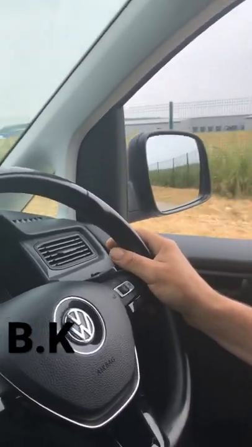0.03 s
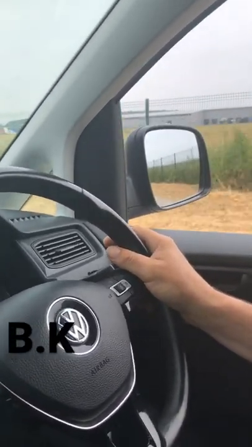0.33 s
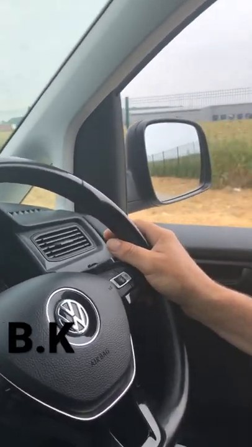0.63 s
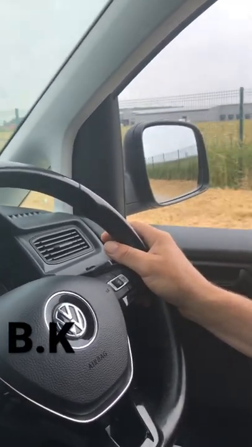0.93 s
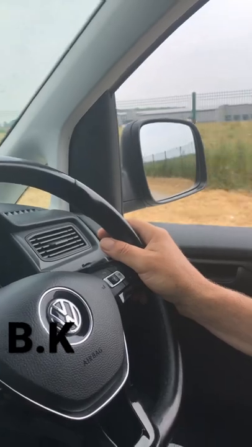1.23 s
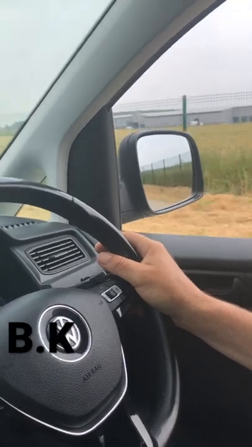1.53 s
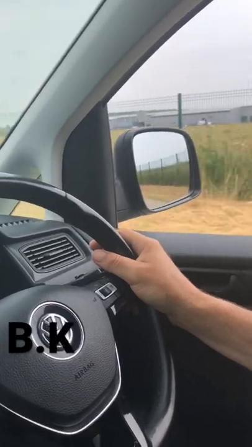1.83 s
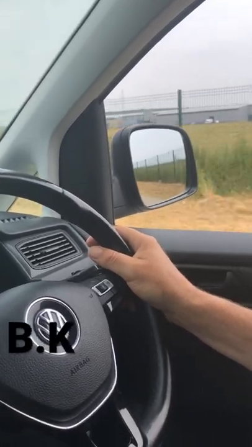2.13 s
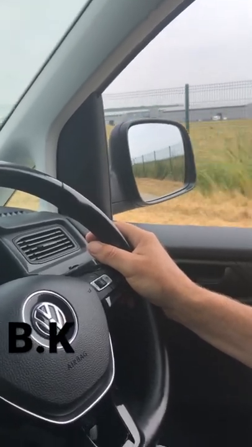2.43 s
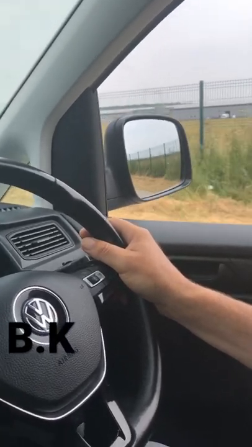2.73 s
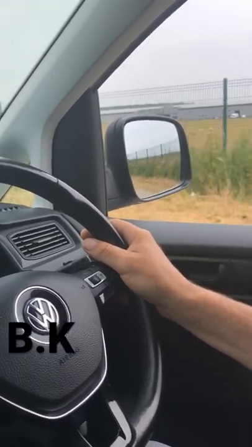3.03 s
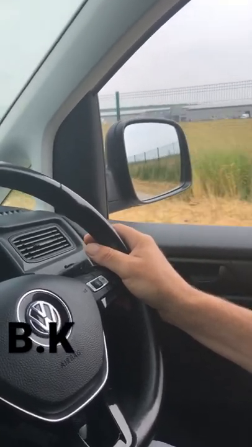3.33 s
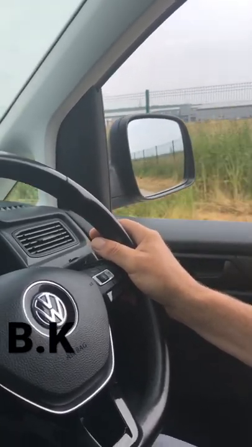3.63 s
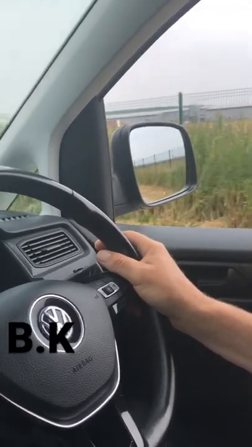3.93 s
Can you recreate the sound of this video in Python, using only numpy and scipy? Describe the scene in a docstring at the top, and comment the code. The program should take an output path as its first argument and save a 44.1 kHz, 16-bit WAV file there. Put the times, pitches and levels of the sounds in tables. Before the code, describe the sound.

A high, wavering wind whistle sings over the side mirror of a moving van, heard from inside. It climbs in pitch and turns breathy at times, over wind hiss, tyre roar, a slowly rising engine and low booms from bumps.

```python
"""A high, wavering whistle: air sings over the side mirror of a van gathering speed on a country road.
Heard from inside, it climbs with each gust and breaks from a clean tone into a rough, breathy one.
Under it, wind hisses along the window, the tyres roar, the engine slowly rises and the cabin booms
over bumps. Near the end the driver eases off and loose trim ticks once, with a small bounce."""
import sys
import numpy as np
from scipy import signal
from scipy.fft import rfft, irfft
from scipy.io import wavfile

SR = 44100
rng = np.random.default_rng(int(sys.argv[2]) if len(sys.argv) > 2 else 0)


def log_audio(samples):
    """Write samples as a 16-bit WAV file to the path given in sys.argv[1]."""
    # one column per channel
    frames = np.atleast_2d(samples).T
    # limit to full scale, then quantise
    limited = np.clip(frames, -1, 1)
    pcm = np.round(limited * 32767).astype(np.int16)
    wavfile.write(sys.argv[1], SR, pcm)


N = 176400  # 4 s


def undb(db):
    """Decibels to gain."""
    return 10 ** (np.asarray(db) / 20)


def unit(x):
    """Scale to an rms of 1."""
    return x / np.sqrt(np.mean(np.abs(x) ** 2))


def clock():
    """Time of every sample in seconds."""
    return np.arange(N) / SR


def curve(table, column=1):
    """An automation lane: one column of a table, joined by straight lines in time."""
    rows = np.array(table)
    return np.interp(clock(), rows[:, 0], rows[:, column])


def swell(at, length):
    """A bell-shaped envelope peaking at `at`, with a standard deviation of `length` seconds."""
    return np.exp(-.5 * ((clock() - at) / length) ** 2)


def coloured(eq):
    """Noise of rms 1 through an EQ curve of (f/Hz, level/dB) points."""
    hz, db = np.array(eq).T
    f = np.maximum(np.fft.rfftfreq(N, 1 / SR), 1)
    gain = undb(np.interp(np.log(f), np.log(hz), db))
    return unit(irfft(rfft(rng.standard_normal(N)) * gain, N))


def wander(rate_hz):
    """A smooth random modulator of rms 1 that moves at up to about this rate."""
    f = np.fft.rfftfreq(N, 1 / SR)
    lowpass = (f > 0) / (1 + (f / rate_hz) ** 2)
    return unit(irfft(rfft(rng.standard_normal(N)) * lowpass, N))


def tone(hz):
    """A sine of rms 1 on a moving pitch."""
    return np.sqrt(2) * np.sin(2 * np.pi * np.cumsum(hz) / SR)


def resonance(hz, width_hz):
    """A randomly driven resonance of rms 1, whose centre may move."""
    phase = 2 * np.pi * np.cumsum(hz * np.ones(N)) / SR
    return wander(width_hz / 2) * np.cos(phase) + wander(width_hz / 2) * np.sin(phase)


def peak(hz, centre_hz, half_width_hz, db):
    """The lift in dB that a stationary resonance gives to a moving tone."""
    return db / (1 + ((hz - centre_hz) / half_width_hz) ** 2)


# EQ of the body rumble: f/Hz, level/dB
RUMBLE_EQ = [(15, -40), (29, -39), (37, -7), (44, 0), (62, -2), (76, -10), (88, -3.5), (99, -2.5),
             (109, -3.5), (121, -2), (136, -11.5), (160, -8.5), (230, -13.5), (320, -16), (385, -19),
             (470, -18), (560, -24), (1200, -62)]
# fader of the body rumble: t/s, level/dB
RUMBLE_FADER = [(0, -25), (1.12, -21), (1.5, -22), (2.3, -23), (3, -20), (4, -22.5)]


def body_rumble():
    """The low bed: the van's body rumbles as it rolls."""
    return coloured(RUMBLE_EQ) * undb(curve(RUMBLE_FADER))


# fader of the cabin's main air mode: t/s, level/dB
DRONE_FADER = [(0, -21), (.25, -32), (.45, -28), (1, -43), (1.8, -36), (2.05, -22), (2.4, -25), (3.2, -40),
               (3.5, -23.5), (4, -26)]


def cabin_drone(pitch_hz=97.35, waver_hz=2.8, flicker_db=1.7):
    """The road keeps the air in the cabin humming near one pitch."""
    hum = tone(pitch_hz + waver_hz * wander(12.4))
    return hum * undb(curve(DRONE_FADER) + flicker_db * wander(33))


# tyres slapping the edge of a bump: t/s, length/s, level/dB
SLAPS = [(1.14, .012, -30)]
# EQ of the slap: f/Hz, level/dB
SLAP_EQ = [(150, -16), (600, 10), (1200, -2), (2700, -8), (8000, -50)]
# booms over bumps in the road: t/s, length/s, level/dB
BUMP_BOOMS = [(.71, .045, -23), (1.074, 0.028, -19), (1.18, 0.031, -13), (1.29, 0.021, -16.5),
              (1.803, 0.049, -20), (2.029, 0.025, -17), (2.211, .03, -19), (2.43, 0.076, -18),
              (2.949, 0.036, -13)]
# cabin modes shaken by a bump: f/Hz, width/Hz, relative level/dB
BOOM_MODES = [(46.9, 7.1, 2), (98.2, 24.4, 0), (256.3, 112, -10.5)]


def road_bumps():
    """Each bump sets the cabin booming; the tyres slap the edge of one."""
    slap = coloured(SLAP_EQ) * sum(undb(db) * swell(at, length) for at, length, db in SLAPS)
    shake = sum(undb(db) * swell(at, length) for at, length, db in BUMP_BOOMS)
    boom = sum(undb(db) * tone(hz + width / 2 * wander(width)) for hz, width, db in BOOM_MODES)
    return slap + shake * unit(boom)


# revs, as the rate of the four-stroke cycle: t/s, f/Hz
ENGINE_REVS = [(0, 20.05), (2, 23.0), (3, 24.85), (3.45, 25.5), (4, 25.4)]
# engine harmonics: multiple of the cycle rate, base level/dB
ENGINE_HARMONICS = [(4, -37.5), (8, -37.5), (9, -38.5), (11, -44), (12, -37), (14, -42.5), (16, -45.5)]
# cabin resonances that the harmonics sweep through: f/Hz, half width/Hz, boost/dB
CABIN_PEAKS = [(95, 3.9, 15.5), (238.6, 13.6, 5.5), (346.6, 18, 6)]


def engine(ease_off_s=3.38, ease_off_db=-4, waver_hz=.5, flicker_db=1.43):
    """Harmonics rise with the revs, boom in the cabin's resonances and soften as the driver eases off."""
    cycle_hz = curve(ENGINE_REVS)
    duck_db = ease_off_db * np.clip((clock() - ease_off_s) * 10, 0, 1)  # 0.1 s fade
    mix = 0
    for order, db in ENGINE_HARMONICS:
        hz = order * cycle_hz
        boom_db = sum(peak(hz, *mode) for mode in CABIN_PEAKS)
        harmonic = tone(hz + waver_hz * wander(5.8))
        mix = mix + harmonic * undb(db + boom_db + duck_db + flicker_db * wander(2.9))
    return mix


# EQ of the tyre roar: f/Hz, level/dB
TYRE_EQ = [(250, -12.5), (480, -4), (640, -0.5), (785, 0), (835, -2.5), (885, 2.5), (935, -5), (985, 5.5),
           (1060, -6.5), (1180, -2), (1270, -4.5), (1340, -5.5), (1410, 1.5), (1460, -3), (1610, -3),
           (1750, -8), (1890, -12), (2400, -14.5), (3000, -23.5), (4500, -34.5), (9000, -42)]
# fader of the tyre roar: t/s, level/dB (before gain_db)
TYRE_FADER = [(0, -33.5), (1.15, -31), (1.6, -31.5), (2.7, -30), (2.9, -28.5), (3.0, -29), (3.35, -26),
              (3.5, -30), (4, -27)]


def tyre_roar(gain_db=-1.78, flicker_db=1.12):
    """The tyres roll out a restless midrange roar that builds with speed."""
    return coloured(TYRE_EQ) * undb(curve(TYRE_FADER) + gain_db + flicker_db * wander(33))


# fader of the tread's song: t/s, level/dB
TREAD_FADER = [(0, -41), (.3, -34.5), (.45, -45), (.72, -34.5), (.9, -44), (1.25, -33), (1.6, -43),
               (2.35, -34.5), (2.7, -44.5), (2.9, -29), (3.02, -37.5), (3.36, -30.5), (3.56, -37.5),
               (3.85, -28.5), (4, -35)]


def tyre_tread(centre_hz=1065, width_hz=172):
    """The tread sings in one band, swelling with the road surface and the speed."""
    edges_hz = [centre_hz - width_hz / 2, centre_hz + width_hz / 2]
    band = signal.butter(2, edges_hz, "bandpass", fs=SR, output="sos")
    return unit(signal.sosfilt(band, rng.standard_normal(N))) * undb(curve(TREAD_FADER))


# EQ of the wind along the window: f/Hz, level/dB
WIND_EQ = [(2500, 5), (3200, 7), (4600, 3.5), (6800, 1.8), (7550, 0.5), (8100, 1), (9000, -3), (9900, -7.5),
           (11000, -9.5), (12300, -13.5), (15500, -22)]
# fader of the wind: t/s, level/dB (before gain_db)
WIND_FADER = [(0, -51), (.5, -50), (1.5, -49), (2.2, -47), (2.7, -47), (2.92, -43.5), (3.15, -46.7),
              (3.5, -44.5), (3.75, -46), (3.87, -49), (4, -47)]
# resonances of the window gap: f/Hz, width/Hz, level/dB against the hiss
WINDOW_GAP_MODES = [(6350, 400, -15.5), (7150, 280, -17)]


def window_wind(gain_db=4, flicker_db=.35, gap_flicker_db=3.2):
    """Air hisses along the window, louder and brighter with speed, and fitfully rings the gap."""
    gap = sum(undb(db + gap_flicker_db * wander(14)) * resonance(hz, width)
              for hz, width, db in WINDOW_GAP_MODES)
    level_db = curve(WIND_FADER) + gain_db + flicker_db * wander(14)
    hiss = coloured(WIND_EQ)
    treble = signal.sosfiltfilt(signal.butter(4, 9500, "highpass", fs=SR, output="sos"), hiss)
    shelf_db = -2.5 + clock()  # the high shelf opens by 1 dB a second
    hiss = hiss + treble * (undb(shelf_db) - 1)
    return (hiss + gap) * undb(level_db)


# hits of loose trim: t/s, level/dB
TRIM_HITS = [(3.6752, -23), (3.683, -31)]
# EQ of a tick: f/Hz, level/dB
TICK_EQ = [(500, -13), (2000, 5), (3500, 1), (6000, -7), (9000, -6), (12000, -20), (15500, -28)]


def trim_ticks(attack_s=.0004, decay_s=.0045):
    """Loose plastic trim gives a dry tick and a softer bounce."""
    envelope = 0
    for at, db in TRIM_HITS:
        age = np.maximum(clock() - at, 0)
        envelope = envelope + undb(db) * (1 - np.exp(-age / attack_s)) * np.exp(-age / decay_s)
    return envelope * coloured(TICK_EQ)


# squeaks of a higher whistle mode: t/s, f/Hz, level/dB
SQUEAK_CUES = [(1.53, 5180, -46), (1.729, 5160, -50)]


def mirror_squeaks(length_s=.011, jitter_hz=190):
    """The air at the mirror jumps for an instant to a higher, unsteady mode."""
    return sum(undb(db) * swell(at, length_s) * tone(hz + jitter_hz * wander(200))
               for at, hz, db in SQUEAK_CUES)


def whistle_overtones(hz, width_hz=170, fall_db_per_khz=7, flicker_db=2.5):
    """The whistle's breathy second and third harmonics, fading as it climbs past its median pitch."""
    # a resonance of the seal lifts the octave on its way into the cabin
    seal_db = peak(2 * hz, centre_hz=7530, half_width_hz=480, db=5)
    octave = undb(-21.5 + seal_db) * resonance(2 * hz, width_hz)
    third = undb(-32) * resonance(3 * hz, 2 * width_hz)
    climb_khz = np.maximum(hz - np.median(hz), 0) / 1000
    flicker = unit(undb(flicker_db * wander(20)))
    return (octave + third) * undb(-fall_db_per_khz * climb_khz) * flicker


def whistle_flutter(flutter_db=2.4, dropout_db=-11, threshold=1.1):
    """A trembling gain: the tone breaks for an instant when the airflow strays past a threshold."""
    dropout = np.clip(2 * (wander(45) - threshold), 0, 1)
    tremble = np.minimum(1.3 * wander(70), .8)
    return unit(undb(flutter_db * tremble + dropout_db * dropout))


# pitch and fader of the mirror whistle: t/s, f/Hz, level/dB (before gain_db)
WHISTLE_LINE = [(0, 3160, -44), (.1, 3440, -34), (.18, 3550, -39.5), (.24, 3560, -36.5), (.33, 3625, -41),
                (.47, 3490, -41.5), (.53, 3460, -32.5), (.58, 3510, -47), (.71, 3595, -37),
                (.85, 3600, -37), (1.01, 3680, -41.5), (1.13, 3570, -38), (1.175, 3585, -45),
                (1.25, 3577, -37), (1.37, 3576, -37), (1.48, 3650, -41.5), (1.58, 3820, -40),
                (1.66, 3660, -39), (1.71, 3730, -51), (1.76, 3727, -41.5), (1.83, 3725, -40.5),
                (1.99, 3675, -38.5), (2.08, 3995, -38), (2.24, 4140, -43.5), (2.31, 3850, -41.5),
                (2.4, 3900, -44.5), (2.47, 3790, -41), (2.57, 3870, -42.5), (2.63, 4003, -36),
                (2.73, 3955, -41), (2.81, 4070, -35), (2.87, 4370, -38), (2.94, 4450, -38.5),
                (3.05, 4120, -37.5), (3.23, 4034, -36.5), (3.39, 4234, -37.5), (3.54, 4345, -40.5),
                (3.58, 4480, -28), (3.62, 4510, -41), (3.7, 4410, -30), (3.73, 4400, -36.5),
                (3.795, 4400, -30.5), (3.835, 4180, -35), (3.92, 4270, -35.5), (4, 4200, -40.5)]
# turbulence at the mirror: t/s, roughness (0 clean, 1 all breath)
ROUGHNESS = [(0, .3), (.2, .15), (.45, .35), (.8, .08), (1.1, .25), (1.35, .08), (1.55, .5), (1.9, .4),
             (2.25, .75), (2.55, .55), (2.7, .1), (2.93, .8), (3.17, .06), (3.4, .7), (3.6, .35),
             (3.8, .25), (4, .5)]
# eddies that flick the whistle upward and roughen it: t/s, rise/Hz
EDDIES = [(0.892, 120), (1.074, 99), (1.523, 177), (1.83, 109), (3.329, 90.2), (3.44, 99), (3.655, 162),
          (3.762, 201)]


def mirror_whistle(gain_db=-1.85, waver_hz=18, jitter_hz=95, eddy_s=.011):
    """Vortices shed at the mirror's edge sing; turbulence shakes their pitch and turns them breathy."""
    eddies = sum(swell(at, eddy_s) for at, _ in EDDIES)
    rough = np.clip(curve(ROUGHNESS) + .15 * eddies, 0, 1)
    flick_hz = sum(rise_hz * swell(at, eddy_s) for at, rise_hz in EDDIES)
    hz = curve(WHISTLE_LINE) + flick_hz + waver_hz * wander(25) + jitter_hz * rough * wander(70)
    flutter = whistle_flutter()
    breath = rough ** 1.3  # equal-power crossfade from sine to narrow noise
    core = np.sqrt(1 - breath) * tone(hz) + np.sqrt(breath) * resonance(hz, width_hz=160)
    skirt = undb(-7) * np.sqrt(rough) * resonance(1.02 * hz, width_hz=520)  # airy halo round the tone
    overtones = whistle_overtones(hz)
    strand = undb(-5) * rough * resonance(1.06 * hz, width_hz=140)  # splits off above in rough air
    level_db = curve(WHISTLE_LINE, column=2) + gain_db
    return (flutter * core + strand + overtones + skirt) * undb(level_db)


def scene():
    """The mono mix, heard from the driver's seat."""
    mirror = mirror_whistle() + mirror_squeaks()
    bed = engine() + body_rumble() + tyre_roar() + road_bumps() + tyre_tread() + cabin_drone()
    return (mirror + bed + window_wind() + trim_ticks())[None]


def record(dry, cutoff_hz=15700):
    """A steep low-pass takes off the very top."""
    return signal.sosfilt(signal.ellip(12, .2, 90, cutoff_hz, fs=SR, output="sos"), dry)


dry = scene()
out = record(dry)
log_audio(out)
```